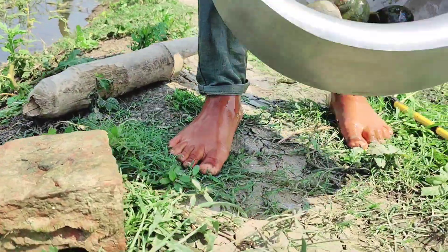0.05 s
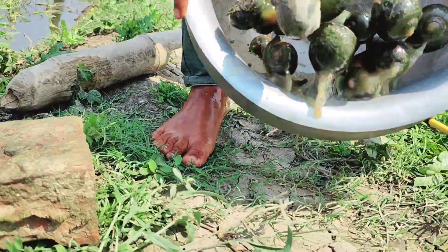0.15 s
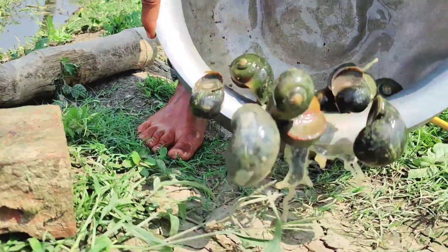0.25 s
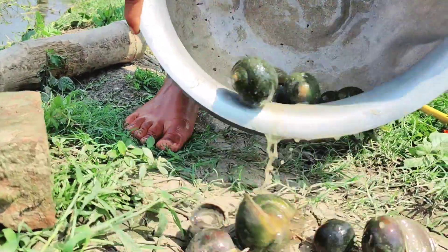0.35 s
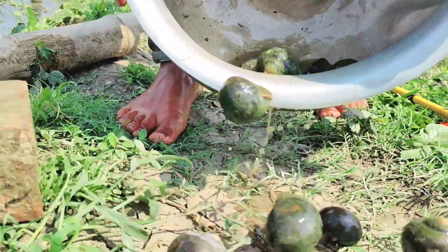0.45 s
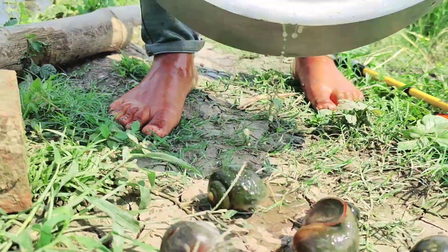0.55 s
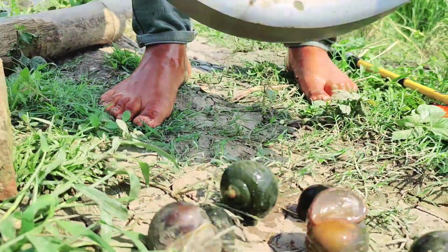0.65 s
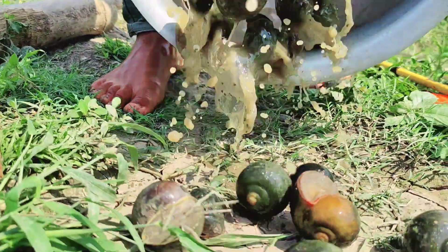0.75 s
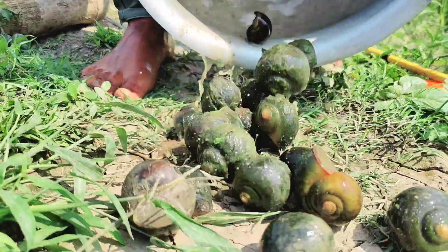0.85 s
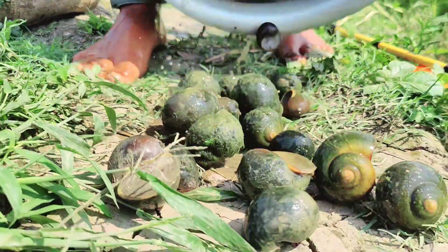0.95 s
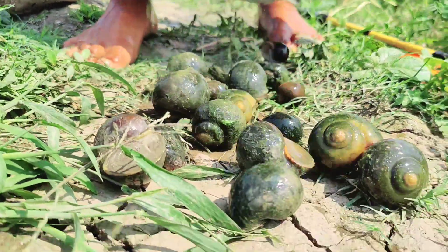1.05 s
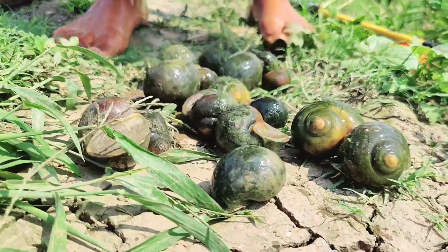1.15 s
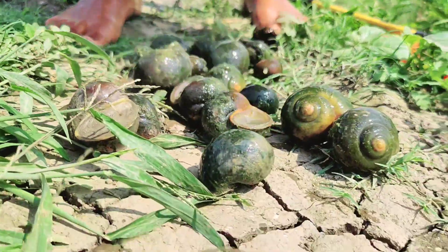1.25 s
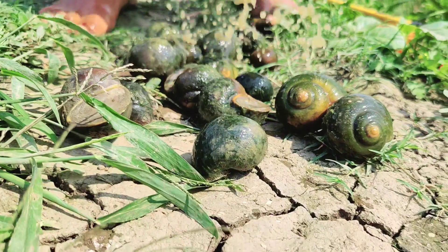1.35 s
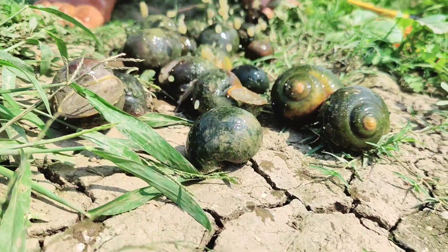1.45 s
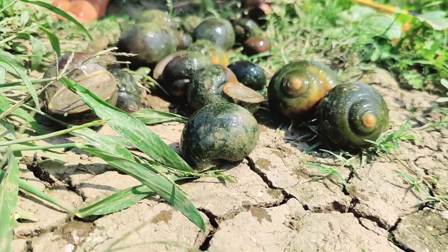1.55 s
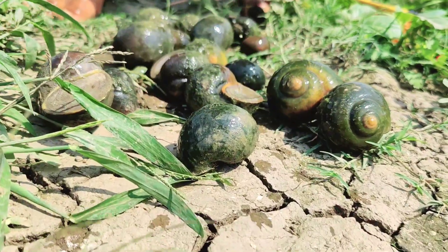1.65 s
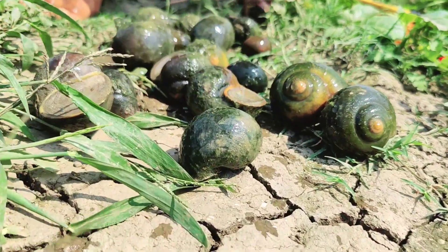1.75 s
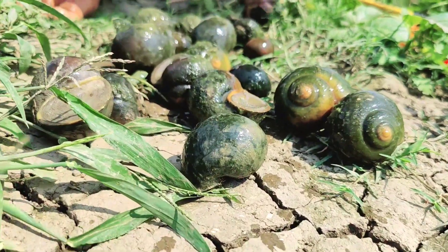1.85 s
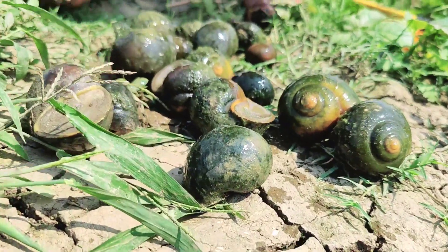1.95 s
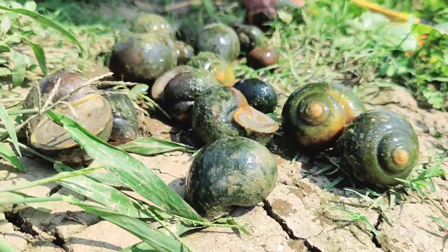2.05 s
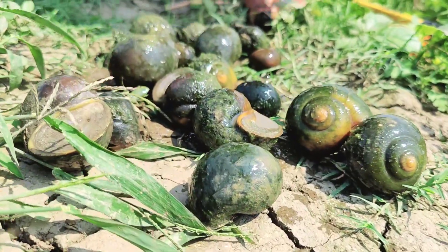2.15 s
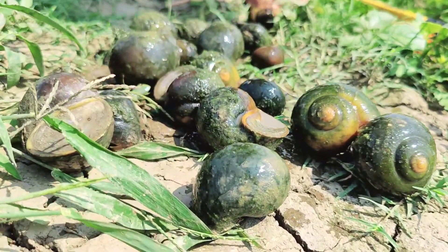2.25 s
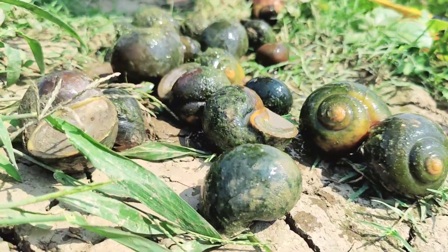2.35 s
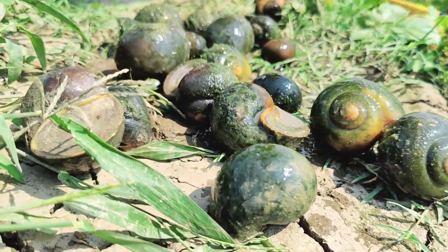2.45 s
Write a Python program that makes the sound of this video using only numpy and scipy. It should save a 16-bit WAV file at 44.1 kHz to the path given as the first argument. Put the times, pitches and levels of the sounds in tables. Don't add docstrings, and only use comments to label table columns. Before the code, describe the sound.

Wet snails tumble from a metal basin, clacking and thudding on soil in two quick rushes

```python
import sys
import numpy as np
from scipy import signal
from scipy.fft import rfft, irfft, next_fast_len
from scipy.io import wavfile
from scipy.ndimage import map_coordinates

SR = 44100
rng = np.random.default_rng(int(sys.argv[2]) if len(sys.argv) > 2 else 0)


def volts(x):
    e = np.asarray(x, float) / 20
    return 10 ** e


def store_wav(level_fs):
    pcm = np.round(np.clip(np.atleast_2d(level_fs), -1, 1) * 32767)
    wavfile.write(sys.argv[1], SR, pcm.T.astype(np.int16))


N = 110250
TOP_HZ = 15800


def unit(x):
    return x / np.sqrt(np.mean(x ** 2) + 1e-20)


def along(points, hz):
    f, value = np.transpose(points)
    return np.interp(np.log(hz + 1), np.log(f + 1), value)


def wobble(rate):
    knots = rng.standard_normal(int(N * rate / SR) + 4)
    return map_coordinates(knots, [np.arange(N) * rate / SR])


def filtered(x, response):
    m = next_fast_len(N + SR // 2)
    mirrored = np.concatenate([x, x[..., :-SR // 20:-1]], -1)
    spectrum = rfft(mirrored, m) * response(np.fft.rfftfreq(m, 1 / SR))
    return irfft(spectrum, m)[..., :N]


def colour(spectrum):
    closed = [(spectrum[0][0] / 2, -60)] + list(spectrum)
    return lambda hz: volts(along(closed, hz))


def hiss(spectrum):
    return unit(filtered(rng.standard_normal((2, N)), colour(spectrum)))


def bursts(s, db, t60_s, length_s):
    t, gate = np.arange(int(length_s * SR)) / SR, np.zeros(N + SR)
    for start, level in zip(s, db):
        gate[round(start * SR):][:len(t)] += volts(level - 60 * t / t60_s)
    return gate[:N]


def rings(s, db, hz, cycles, length_s, rise=0, choke_s=np.inf):
    t = np.arange(int(length_s * SR)) / SR
    s, db, hz = s[:, None], db[:, None], hz[:, None]
    phase = rng.random((len(s), 2)) * 2 * np.pi
    choke_db = 60 * np.maximum(t - choke_s, 0) / 0.03
    onset = 1 - np.exp(-t * hz * 2)
    body = volts(db - 60 * t * hz / cycles - choke_db) * onset
    turn = 2 * np.pi * hz * t * (1 + rise * t * hz / cycles)
    at = (np.round(s * SR) + np.arange(len(t))).astype(int).ravel()
    copies = [body * np.sin(turn + phase[:, [k]]) for k in range(2)]
    return np.array([np.bincount(at, copy.ravel(), N + SR)[:N] for copy in copies])


def swarm(per_s, hz, spread, size_db, cycles, length_s, rise=0):
    pour_s = 1.2
    u = rng.random((int(per_s * pour_s), 3))
    pitch = np.clip(hz * np.exp(spread * rng.standard_normal(len(u))), 100, 16000)
    size = -size_db * np.log(np.maximum(u[:, 1], 1 / 20))
    grains = rings(pour_s * u[:, 0], size, pitch, cycles * (.5 + u[:, 2, None]), length_s, rise)
    return unit(grains) * np.sqrt(pour_s * SR / N)


# f/Hz, level/dB
WIND_COLOUR = [(25, -25), (50, 2), (130, 3.5), (230, -9), (500, -15), (900, -36), (1300, -70.5)]
# f/Hz, level/dB
FIELD_COLOUR = [(900, -18), (1650, -12), (2200, -1), (2800, -13), (5000, -18), (15000, -32)]


def air():
    start_s, push_db, push_hz = np.array([[1.548], [-21], [60]])
    push = rings(start_s, push_db, push_hz, cycles=7, length_s=.15)
    flutter_db = 4.5 * np.tanh(wobble(30))
    wind = volts(-42.5 + flutter_db) * hiss(WIND_COLOUR)
    return push + wind + volts(-65.5 + wobble(51)) * hiss(FIELD_COLOUR)


# f/Hz, level/dB
GRASS_COLOUR = [(900, -4), (1300, 3), (3600, 4), (15500, -8.5)]
# middle t/s, length t/s, level/dB, extra level/dB above 5 kHz
RUSTLE_SWELLS = [(0.024, 0.045, -40, -1), (0.128, 0.29, -51, -6), (1.313, .08, -69, 9),
                 (1.158, 0.21, -53, -3), (1.385, 0.056, -57, 1.5), (1.446, 0.076, -51, 4.5),
                 (1.576, 0.092, -55.5, 8), (1.699, 0.09, -55, 11.5), (2.08, 0.051, -44, -8),
                 (2.16, 0.073, -63, -2), (2.227, 0.05, -58, -3.5), (2.454, 0.13, -59, 0)]


def rustles():
    t = np.arange(N) / SR
    low = lambda hz: 1 / (1 + (hz / 5000) ** 4)
    dull = filtered(hiss(GRASS_COLOUR), low)
    bright = filtered(hiss(GRASS_COLOUR), lambda hz: 1 - low(hz))
    swells = 0
    for middle, length, db, bright_db in RUSTLE_SWELLS:
        swell = np.exp(-(2 * (t - middle) / length) ** 2)
        swells = swells + volts(db) * swell * (dull + volts(bright_db) * bright)
    return swells * volts(wobble(60) + 1.5 * wobble(300))


# t/s, peak level/dB, f/Hz
DRIP_TICKS = [(.416, -10, 8200), (0.5387, -15, 9300), (0.7184, -33, 9000), (1.0808, -16.5, 7150),
              (1.1099, -31.5, 8050), (1.1796, -34, 7000), (1.2506, -31.5, 5300), (1.2918, -54, 3230),
              (1.433, -38, 8440), (1.5346, -52, 6950), (1.556, -43, 8500), (1.5898, -25, 11400),
              (1.6081, -43.5, 10600), (1.6289, -31, 8000), (1.662, -40.5, 7450), (1.6805, -38, 4590),
              (1.688, -48, 9440), (1.694, -46, 4610), (1.7012, -29, 7280), (1.72, -48, 12050),
              (1.7422, -34.5, 7300), (1.7681, -44, 2980), (1.777, -39, 9000), (1.9017, -59, 6920),
              (1.9205, -59, 6490), (2.075, -35, 2200), (2.319, -60.5, 6000)]


def drips():
    s, db, hz = np.transpose(DRIP_TICKS)
    falling = s < 1.3
    crack = bursts(s[falling], db[falling] - 7, t60_s=0.059, length_s=.02)
    scatter = rng.standard_normal((5, len(s)))
    cluster = sum(rings(s + .001 * np.abs(v), db - 10.5, np.minimum(hz * np.exp(.3 * v), TOP_HZ), 40, .02)
                  for v in scatter)
    return crack * hiss([(1500, -17.5), (16000, -10.5)]) + rings(s, db - 4, hz, 45, 0.018) + cluster


# f/Hz, level/dB, time to die by 60 dB t/s
BASIN_MODES = [(435, 1, 0.61), (692, -0.5, 0.42), (781, -9.5, 0.31), (948, -3, .1), (1170, 2, 0.37),
               (1385, 2, 0.17), (1665, -5, 0.45), (2010, 2.5, 0.2), (2510, -2.5, 0.12)]
# t/s, level/dB, favoured mode f/Hz, choked by the next shell after t/s
KNOCKS = [(0, -23, 1385, 0.37), (0, -35.5, 2010, .2), (0, -38, 692, 0.084), (0.041, -38.5, 780, 0.24),
          (0, -40.5, 435, 0.11), (0.254, -16.5, 1170, 0.035), (.3, -12.5, 780, .06),
          (0.334, -12.5, 1170, .03), (0.421, -9, 1665, .03), (0.451, -9.5, 1665, 0.085),
          (0.442, -21.5, 435, 0.25), (.49, -27.5, 692, 0.19), (0.519, -18, 1385, 0.045),
          (0.539, -26.5, 1170, 0.056), (.65, -25, 1385, 0.2), (.65, -30, 1170, 0.02),
          (0.811, -15, 1170, 0.039), (.852, -20.5, 1170, 0.036), (0.851, -24.5, 435, 0.12),
          (0.936, -17, 1170, 0.041), (.96, -22, 435, 0.48), (.968, -17.5, 1170, 0.037)]


def basin():
    s, db, place_hz, choke_s = np.transpose(KNOCKS)
    ring = 0
    for f, mode_db, t60_s in BASIN_MODES:
        u = rng.standard_normal(len(s))
        elsewhere = np.abs(np.log(f / place_hz)) > 1 / 10
        off_place_db = -16 * elsewhere * (1 + 0.043 * u)
        rise = -.05 * (f == 1170)
        ring = ring + rings(s, db + mode_db + off_place_db, f * (1 + 0.0059 * u), f * t60_s, 0.4,
                            rise, choke_s[:, None])
    return ring * [[1], [.6]] * volts(0.73 * wobble(45))


# t/s, peak level/dB, f/Hz
GROUND_THUDS = [(0.102, -24.5, 265), (.197, -18.5, 244), (0.211, -19.5, 247), (.245, -5.5, 246),
                (0.26, -8, 256), (0.272, -12.5, 282), (0.296, -10.5, 242), (0.314, -16, 270),
                (0.335, -9, 336), (0.354, -7, 328), (0.368, -8, 335.7), (0.385, -4, 338.4),
                (0.417, -14, 280), (0.436, -16, 276), (.463, -11, 305), (0.476, -8, 292),
                (0.487, -16.5, 330), (0.511, -16, 288), (0.592, -12.5, 274), (0.601, -8.5, 298),
                (0.611, -11.5, 274), (0.631, -17, 304), (0.759, -18, 278), (.788, -11, 228),
                (0.804, -12, 243), (0.916, -9.5, 432), (0.961, -17.5, 315), (1.039, -24, 192),
                (.72, -27.5, 340)]


def thuds():
    s, db, hz = np.transpose(GROUND_THUDS)
    return rings(s, db + 4, hz, 7.64, 0.07) + rings(s, db - 8.5, hz / 2, 3.63, .08)


# f/Hz, level/dB
SHELL_COLOUR = [(450, -10), (850, -7.5), (1150, -4), (1800, 0.5), (2800, -2), (6000, -26), (9000, -34)]
# t/s, peak level/dB, f/Hz
POUR_CLACKS = [(0.1, -23, 1110), (.104, -24.5, 1400), (.154, -34.5, 1280), (.192, -30.5, 1180),
               (.202, -27, 1830), (.22, -23.5, 1230), (0.245, -2, 2680), (0.249, -5.5, 1111),
               (.246, -8.5, 4400), (0.271, -4, 1081), (.276, -9, 2040), (0.295, -6.5, 990),
               (0.314, -14, 1190), (.326, -8.5, 1110), (0.336, -11.5, 1260), (.338, -8.5, 2300),
               (0.35, -11, 1240), (.367, -10.5, 2080), (0.371, -3.5, 1147), (0.386, -4, 1960),
               (.399, -12.5, 1184), (0.416, -2, 1660), (.424, -4, 1644), (0.45, -9.5, 1570),
               (0.466, -4, 2273), (0.487, -5, 1610), (.5, -9.5, 1750), (.512, -8, 3130), (0.519, -12, 1340),
               (.545, -19.5, 1545), (0.595, -10, 2640), (.606, -15.5, 1650), (.632, -23, 1470),
               (0.647, -9.5, 1650), (.649, -18.5, 2370)]
# t/s, peak level/dB, f/Hz
SLIDE_CLACKS = [(0.757, -20, 1420), (.77, -18.5, 2170), (0.789, -7.5, 1540), (.789, -8.5, 4300),
                (.792, -2, 2320), (0.806, -7.5, 1460), (.81, -7, 2370), (0.816, -3, 1524),
                (.825, -14.5, 1330), (.845, -11, 3000), (0.917, 0.5, 2080), (0.926, -7.5, 1001),
                (0.941, -6, 2010), (0.964, -6, 2720), (.98, -28.5, 2270), (1.001, -5, 1900),
                (1.003, -10, 2730), (1.019, -11.5, 2000), (1.04, -12.5, 1910), (1.048, -19, 2320),
                (1.081, -28, 1870), (1.11, -22.5, 2350), (1.155, -40, 2290), (1.179, -30.5, 2310),
                (1.249, -33.5, 2550), (1.291, -42.5, 1690), (1.452, -38.5, 1174), (1.459, -42, 2000),
                (1.914, -46.5, 2149), (2.307, -52, 2153), (2.462, -52.5, 2240)]


def clacks():
    s, db, hz = np.transpose(list(POUR_CLACKS) + list(SLIDE_CLACKS))
    modes = [(1, -6.0, 85, 0.0016), (0.95, -15, 34, 0.00078), (1.4, -19.5, 10, 0.0017)]
    shell = 0
    for k, (ratio, mode_db, cycles, late_s) in enumerate(modes):
        u = rng.standard_normal(len(s))
        pitch = hz * ratio * (1 + 0.053 * k * u)
        shell = shell + rings(s + late_s, db + mode_db + 2 * u, pitch, cycles, .06)
    crack = bursts(s, db - 14.0, t60_s=0.065, length_s=.05) * hiss(SHELL_COLOUR)
    snap_hiss = hiss([(1000, 2.5), (4500, -1.5), (7000, -16.5), (16000, -40)])
    return shell + crack + bursts(s, db - 14.5, t60_s=.014, length_s=.05) * snap_hiss


# f/Hz, level/dB
SPLASH_COLOUR = [(2500, 1.5), (4500, -5), (14000, -4.5), (16400, -24.5)]
# t/s, shells level/dB, water level/dB
POURING = [(0.186, -43, -64.5), (0.199, -40.5, -52), (.24, -23, -37), (0.245, -21, -32.5),
           (.42, -15.5, -31), (0.528, -21, -32), (.58, -25, -43.5), (0.668, -33.5, -53),
           (.745, -56.5, -66.5), (0.7845, -32, -39.5), (0.79, -25, -24), (0.869, -27, -36),
           (0.892, -40, -56), (0.912, -50, -53.5), (0.918, -19.5, -28), (1.047, -24.5, -28),
           (1.059, -35.5, -50.5), (1.124, -40.5, -55.5)]


def flow(column):
    rows = np.transpose(POURING)
    return volts(np.interp(np.arange(N) / SR, rows[0], rows[column], -120, -120))


def wetted(grains, spectrum):
    return unit(filtered(grains + .6 * rng.standard_normal((2, N)), colour(spectrum)))


def tumbling():
    contacts = swarm(800, 1701.4, .45, 2.5, cycles=32, length_s=0.028)
    rattle = wetted(contacts, SHELL_COLOUR)
    soft_thuds = swarm(110, 319.0, 0.34, 7.7, cycles=7.5, length_s=0.0495) * volts(-8)
    bubbles = swarm(3000, 6407, 0.549, 1.7, cycles=41, length_s=0.005, rise=0.55)
    fizz = wetted(bubbles, SPLASH_COLOUR)
    shells = volts(-4 + 1.5 * wobble(70)) * rattle + soft_thuds
    return flow(1) * shells + flow(2) * volts(1.5 + 2 * wobble(45)) * fizz


# f/Hz, likeness from 0 to 1
LIKENESS = [(30, 0.96), (150, .99), (400, 0.95), (800, 0.68), (1500, 0.55), (3000, 0.55), (8000, 0.078),
            (14000, 0.45)]


def stereo(pair):
    angle = lambda hz: np.arccos(np.clip(along(LIKENESS, hz), -1, 1)) / 2
    mid, side = filtered(pair, lambda hz: np.array([np.cos(angle(hz)), np.sin(angle(hz))]))
    return np.array([mid + side, mid - side])


def scene():
    heap = rustles() + drips() + basin() + thuds() + clacks() + tumbling()
    return stereo(air()) + stereo(heap) * volts([[.5], [-.5]])


def top_cut(x):
    return signal.sosfilt(signal.butter(12, 16460, fs=SR, output="sos"), x)


# f/Hz, level/dB
PORT_COLOUR = [(5000, 1), (5900, -3.5), (7300, 4.5), (9000, -1)]


def record(dry):
    def microphone(hz):
        low_cut = hz ** 2 / (hz ** 2 + 30 ** 2)
        high_cut = 1 / (1 + (hz / TOP_HZ) ** 70)
        return volts(along(PORT_COLOUR, hz)) * low_cut * high_cut

    x = filtered(dry, microphone)
    mix = x / (1 + np.abs(x) ** 6) ** (1 / 6)
    return top_cut(mix)


dry = scene()
out = record(dry)
store_wav(out)
```